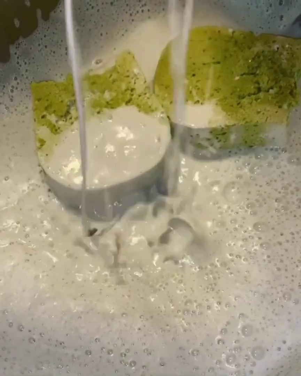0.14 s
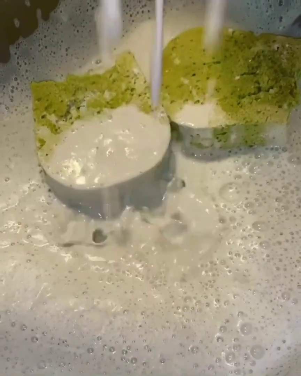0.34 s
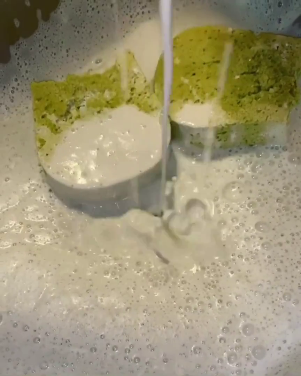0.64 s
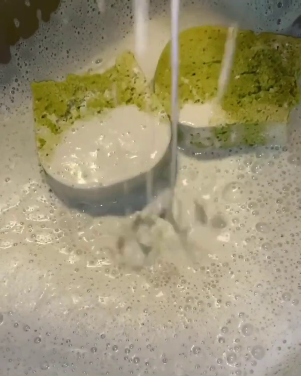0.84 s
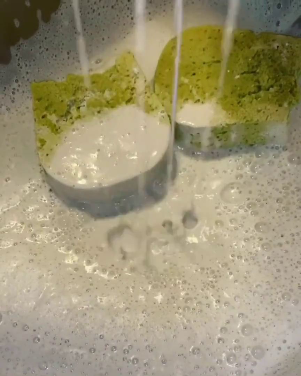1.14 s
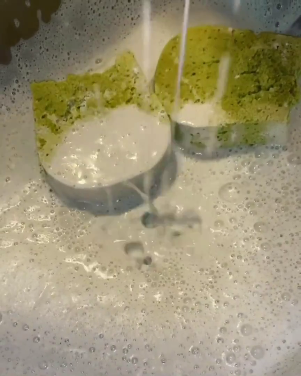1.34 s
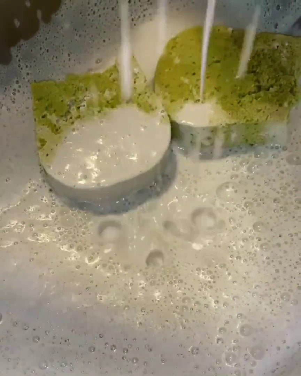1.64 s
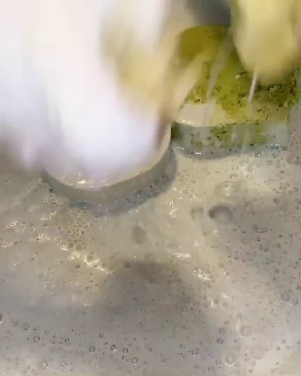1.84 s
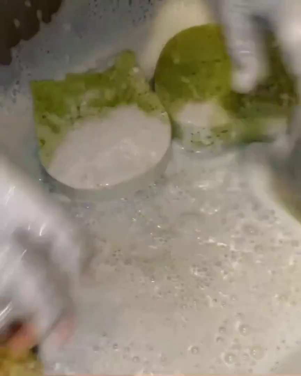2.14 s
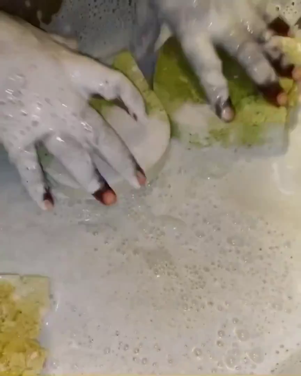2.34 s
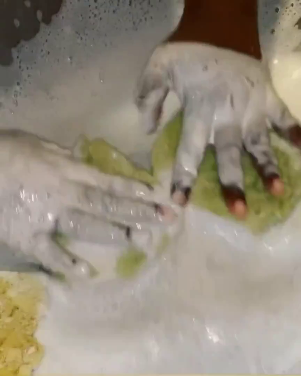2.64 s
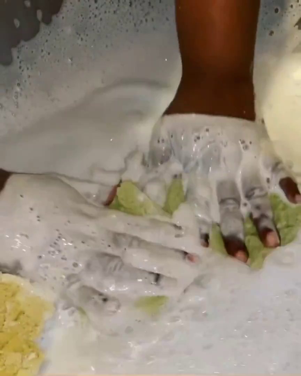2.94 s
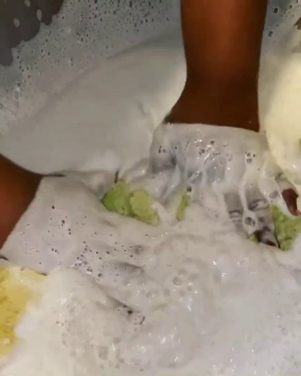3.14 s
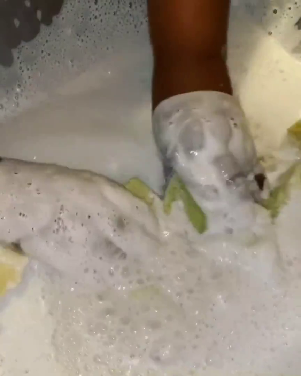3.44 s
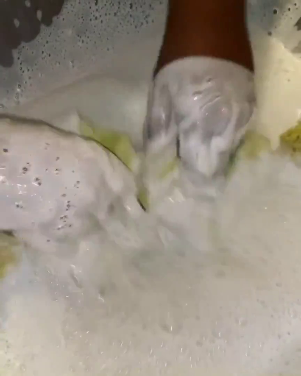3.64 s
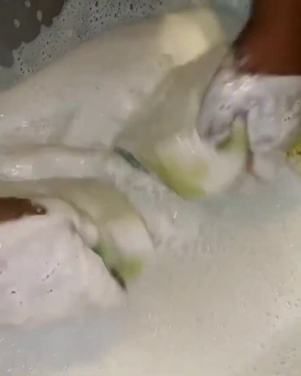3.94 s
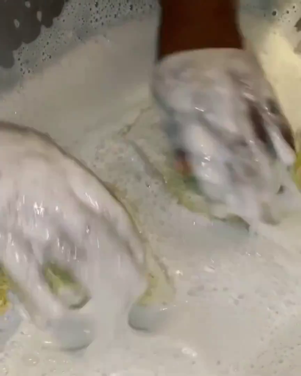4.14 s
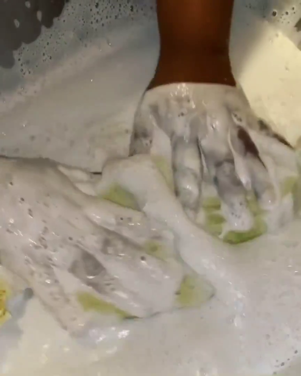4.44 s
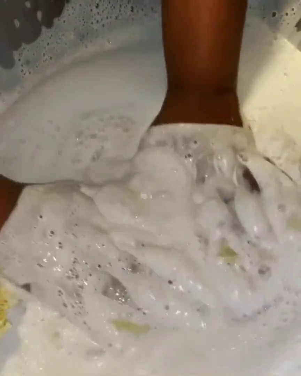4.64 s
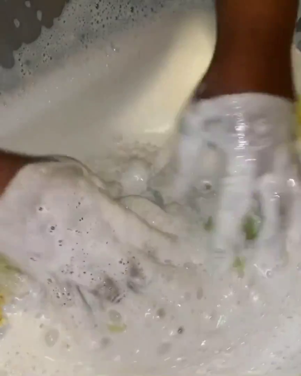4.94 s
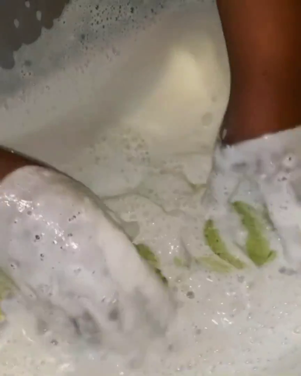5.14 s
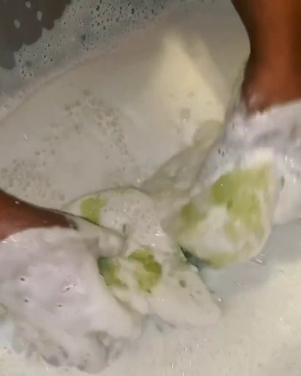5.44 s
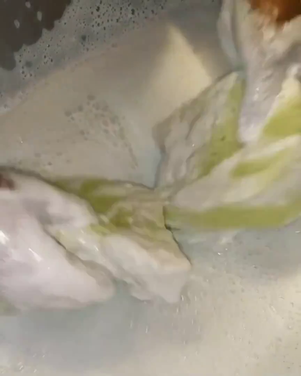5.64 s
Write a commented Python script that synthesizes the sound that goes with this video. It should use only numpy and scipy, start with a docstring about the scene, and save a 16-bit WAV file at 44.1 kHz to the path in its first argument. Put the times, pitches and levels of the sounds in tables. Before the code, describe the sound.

A close, wet stereo scene in a small room with faint low air noise and a wavering hum. From 0 to about 1.9 seconds, threads of soapy water patter into a foamy basin: crisp spatter, hollow low churning, round bubble plops and irregular splats, especially strong around 0.4 and 0.8 to 1.1. The streams gradually thin and stop. At about 1.98 one short hard knock sounds, with a low, quickly damped basin thud. It becomes much quieter, with tiny fizzing and trickles. At 2.75 to 3.15 soaked sponges are pressed, giving dense squelches, bubbling and small smacks. Softer suds follow, then a short squish and gulp near 3.8. Another slow squeeze builds around 4.5 to 4.75, squirting and gurgling. Deep gulps with falling pitch boom at 4.75, 5.0, 5.1 and 5.2. A small splat at 5.4 precedes fading squish, drips and faint foam fizz.

```python
"""Threads of soapy water patter on foam and churn a basin: bursting bubbles and resonant noise.
Large bubbles ring and gobs splat as noise bursts; the streams thin out, and a released sponge gulps.
Two hands then press the sponges: dense bubbles squelch, fizz, squirt, gurgle and trickle. A knock
early in the pressing excites the basin's modes, and later gulps of falling pitch make it boom.
Throughout, resting foam fizzes faintly and a small room adds coloured air noise and a wavering hum."""
import sys
import numpy as np
from scipy import signal
from scipy.fft import rfft, irfft, next_fast_len
from scipy.io import wavfile
from scipy.ndimage import uniform_filter1d, map_coordinates

SR = 44100
rng = np.random.default_rng(int(sys.argv[2]) if len(sys.argv) > 2 else 0)


def dump(signal):
    """Clip the signal to [-1, 1] and save it as 16-bit WAV at the path in sys.argv[1]."""
    limited = np.clip(np.atleast_2d(signal).T, -1, 1)
    pcm = np.round(limited * 32767).astype(np.int16)
    wavfile.write(sys.argv[1], SR, pcm)


N = 255339

# In all tables, levels are relative: each source applies its own trim.
# falling streams, thinning out as the sponges empty: start_s, patter_db, churn_db
FLOW = [(0.0, -43.5, -41.5), (0.23, -44, -47.5), (0.37, -45, -44), (0.5, -52, -44.5), (0.6, -53.5, -45),
        (0.7, -50, -43.5), (0.79, -48.5, -48), (0.9, -47.5, -42.5), (1.036, -49, -43), (1.15, -47.5, -46.5),
        (1.29, -50.5, -43), (1.42, -49.5, -43), (1.566, -52.5, -46.5), (1.66, -51.5, -46), (1.75, -59, -53),
        (1.87, -49, -50)]
# water-filled hollow under the streams, its resonances: centre_hz, width_hz, level_db
HOLLOW = [(70, 9.4, -11.5), (151.5, 19.5, -4.5), (228, 28, -9), (290.3, 28.3, -4.5)]
# narrow peaks and dips between the basin's walls: centre_hz, width_hz, lift_db
WALLS = [(622, 60, -8), (973, 130, -10), (1140, 65, 2), (1554, 220, 5), (1800, 240, 3), (2005, 130, -2.5),
         (2353, 88, 2.5), (2517, 370, -6), (3546, 95, 4.5), (4290, 600, 5.5)]
# spectra of splashing water, mid and side: frequency_hz, density_db (per Hz)
SPLASH_MID = [(220, -22.5), (380, -22.5), (464, -8), (746, -5), (900, -29.5), (1050, -0.5), (1160, -4),
              (1540, -6.5), (1950, -8), (2210, 0.5), (3100, -8), (3560, -5), (4860, -17), (6400, -9),
              (7530, -34), (9790, -38.5), (16600, -120)]
SPLASH_SIDE = [(220, -49), (380, -15.5), (513, -6.5), (814, -15.5), (911, -4.5), (1050, -3.5),
               (1180, -15.5), (1470, -16), (2000, -23), (2300, -11), (3340, -18), (3930, -23.5),
               (4350, -23), (5510, -17), (7530, -32.5), (9790, -43), (16600, -120)]
# spectra of still air, mid and side: frequency_hz, density_db (per Hz)
AIR_MID = [(15, -30.5), (25, -15), (50, -1.5), (75, 1), (190, -6), (248, -3.5), (399, -23.5), (675, -24),
           (761, -22), (943, -47.5), (1090, -46.5), (1290, -28), (2570, -56), (3420, -37.5), (6220, -40.5),
           (7530, -51.5), (9790, -84.5), (16600, -120)]
AIR_SIDE = [(15, -50), (25, -2.5), (98, 1.5), (254, 5.5), (472, -7), (761, -8), (1450, -25.5), (1980, -21),
            (3510, -27), (3950, -32.5), (4450, -35), (5930, -28), (7530, -56.5), (9790, -89), (16600, -120)]
# tones of the room's hum: frequency_hz, level_db
HUM = [(48.4, -63.5), (242.2, -57), (290.7, -62.5)]
# large bubbles driven under by a gob, a plunge or a squeeze: start_s, level_db, pitch_hz, t60_s
BLOOPS = [(0.05, -27.5, 289.7, 0.15), (0.082, -19, 301, 0.037), (0.112, -34, 144, 0.23),
          (0.201, -28, 303.5, 0.079), (0.255, -18, 275, 0.041), (0.36, -33.5, 294.6, 0.11),
          (0.369, -27, 154, .12), (0.414, -25, 150.5, .12), (0.458, -34.5, 280.4, 0.3),
          (0.642, -31, 147.4, 0.14), (0.646, -32.5, 209, 0.11), (0.674, -32.5, 293, 0.13),
          (0.678, -25.5, 156.6, 0.1), (0.693, -30.5, 283.4, 0.25), (0.829, -20.5, 282.6, 0.16),
          (0.838, -23.5, 152, 0.14), (0.848, -15, 297, 0.024), (0.885, -25, 308, 0.069),
          (0.911, -23.5, 277.7, 0.14), (0.934, -32, 231.5, .18), (0.968, -35, 143.6, 0.21),
          (0.976, -23, 273, 0.082), (1.0, -24.5, 295, 0.14), (1.035, -18.5, 291, 0.085),
          (1.046, -37, 141, 0.14), (1.086, -27, 275.3, 0.13), (1.153, -38, 243, 0.24),
          (1.176, -33.5, 299, 0.2), (1.336, -30, 296, 0.12), (1.386, -26, 289, 0.074),
          (1.43, -34.5, 295.7, 0.22), (1.486, -26, 298, 0.066), (1.705, -31, 317, 0.094),
          (1.989, -48, 630, .05), (2.052, -42, 625, 0.044), (2.095, -44, 680, 0.033),
          (2.102, -36, 105, 0.075), (2.76, -35, 303, 0.18), (2.781, -33.5, 434, 0.055),
          (2.794, -29.5, 290, 0.1), (2.799, -34, 198, .18), (2.826, -30.5, 289.4, 0.17),
          (2.87, -35.5, 375, 0.061), (2.888, -26.5, 162.5, 0.15), (2.908, -29.5, 291, .12),
          (2.961, -32.5, 175, 0.11), (3.119, -31.5, 406, 0.071), (3.122, -30.5, 169, 0.089),
          (3.144, -30, 301.4, 0.12), (3.471, -38, 296, 0.056), (3.829, -33.5, 301, 0.058),
          (3.832, -42, 728, 0.057), (4.173, -42, 110, 0.081), (4.262, -37, 295, 0.09),
          (4.555, -33.5, 301, 0.17), (4.714, -30.5, 175, 0.16), (4.749, -24.5, 150, 0.066),
          (5.021, -20.5, 154, 0.088), (5.043, -29.5, 56, 0.27), (5.061, -45, 588, 0.054),
          (5.112, -38, 420, .05), (5.135, -30, 173, 0.096), (5.19, -42.5, 300, 0.069),
          (5.226, -46.5, 708, 0.067), (5.262, -35, 240, 0.062)]
# gobs of suds landing and wet smacks: crest_s, level_db, treble_db (re level),
# bubble_hz, bubble_db (re level)
SPLATS = [(0.058, -27.5, -4.5, 3630, -5.5), (0.081, -38.5, -1, 1910, -2), (0.1504, -42, 1, 2330, -8),
          (0.1951, -27.5, -7, 2296, -3.5), (0.204, -32, 0, 3510, -16), (0.222, -39.5, 4, 5200, -5),
          (0.254, -30, -12, 1702, 1), (0.2894, -33, -6, 1785, -6), (0.3195, -36.5, 4, 3120, -14),
          (0.356, -40, -3, 3580, -7), (0.408, -23, -22, 1498, -10.5), (0.4357, -32.5, -16, 2303, 1.5),
          (0.452, -29, -16, 1495, -5), (0.505, -33, -11.5, 1580, -16), (0.6444, -41, -1, 3580, -19),
          (0.6696, -29, -11, 2180, -12), (0.6874, -37, 1.5, 1080, -13), (0.7444, -40.5, -2, 3530, -9),
          (0.8003, -35, -7, 2215, -14), (0.8278, -17.5, -13.5, 2115, -13),
          (0.8778, -23.5, -11, 3560, -11.5), (0.9216, -27, -28, 1143, -10.5),
          (0.973, -31.5, -7.5, 2225, -5), (0.9874, -30.5, -6, 2190, -9), (1.034, -24.5, -21, 1087, -9.5),
          (1.0654, -33, -9, 1040, -15), (1.084, -26.5, -7.5, 2110, -18), (1.1218, -29.5, -9, 1300, -12),
          (1.149, -37.5, 0, 4270, 1), (1.2062, -35.5, -17, 2170, -5), (1.2342, -30.5, -12, 5400, -17),
          (1.265, -29.5, -5, 1567, -7), (1.3404, -25, -8, 4870, -16.5), (1.384, -27.5, -10, 2230, -16),
          (1.407, -41.5, 3.5, 3500, -5), (1.4295, -28, -6.5, 5760, -10.5), (1.486, -37, -11, 6680, -9),
          (1.5028, -34.5, -15, 1568, -0.5), (1.5184, -39, -16, 1450, -8), (1.5444, -35.5, -3.5, 3500, -7.5),
          (1.579, -27.5, -14, 1514, -6), (1.6354, -37.5, -6, 1180, -15), (1.7007, -33.5, -23, 1298, -10),
          (1.7707, -40.5, -13, 1674, -3.5), (2.023, -41, -17, 1250, -10), (2.094, -35.5, -11.5, 1587, -19),
          (2.773, -34.5, -14, 1575, -3), (2.858, -38, -15, 1790, 2), (2.888, -36, -14, 1454, 6),
          (2.94, -40, 2, 1150, -15), (3.053, -39.5, -8, 3530, -8), (3.117, -27, -14, 1793, -5.5),
          (3.125, -31, -15.5, 1233, -3.5), (3.742, -57.5, 1.5, 1500, -10), (3.829, -34, -24, 1212, -9),
          (3.905, -42.5, -10, 1440, -15), (4.137, -38.5, -7, 1724, -2.5), (4.552, -33, -35, 1540, 2.5),
          (4.7116, -42, -28, 1530, -11), (4.749, -29.5, -27.5, 1788, -8), (5.019, -48.5, -6.5, 2700, -5.5),
          (5.227, -42, -19, 1516, -8), (5.268, -48, -20, 1670, -10), (5.315, -50, -17, 1330, -10),
          (5.4001, -30.5, -9, 1611, -9), (5.457, -43.5, -8.5, 1660, -15)]
# gulps of air as a sponge lets go: time_s, level_db, nominal_pitch_hz, boom_db (re level)
GULPS = [(1.578, -25.5, 285, -43), (2.054, -50, 327, 0), (3.791, -32, 321, -32), (3.905, -44.5, 259, -32),
         (4.744, -30.5, 358, -16), (5.015, -27.5, 279, -20), (5.106, -26.5, 267, -17.5),
         (5.221, -28.5, 193, -22)]
# the basin's modes: frequency_hz, level_db, t60_s
BASIN_MODES = [(53.6, 0, 0.038), (69.4, 2, 0.11), (100.4, -9.5, 0.17), (189, -13, 0.099), (249, -25.5, 0.5),
               (301, -2.5, 0.074), (341.3, -21, 0.18)]
# presses of the hands: crest_s, squelch_db, buildup_s, release_s, fizz_db (re squelch),
# squirt_db (re squelch)
PRESSES = [(1.935, -57.5, 0.12, 0.22, 2, 2.5), (2.01, -58.5, 0.04, 0.23, -5, -12),
           (2.291, -65.5, 0.091, 0.42, 5.5, -13), (2.5, -78.5, 0.1, 0.46, 14.5, -13),
           (2.772, -47.5, 0.26, 0.14, -3, -4), (2.9, -43, 0.27, 0.18, -7, -7.5),
           (3.123, -58, 0.12, 0.18, 2, -9), (3.36, -59, 0.057, 0.082, -8.5, -9),
           (3.68, -69.5, 0.11, 0.19, 3, -17), (3.801, -51, 0.042, 0.065, -13, 3),
           (3.83, -47.5, 0.078, 0.13, -11, -5), (4.139, -60.5, 0.039, 0.084, 5, -9),
           (4.49, -52, 0.34, 0.08, -7, 1), (4.56, -48, 0.22, 0.13, -19, 4),
           (4.625, -58.5, 0.048, 0.089, -3.5, 9.5), (4.745, -53.5, 0.096, 0.12, -9, -8),
           (4.9, -76.5, 0.37, 0.32, 5, -4), (5.391, -64.5, 1, 0.61, -8, -2.5)]
# spectra of soaked foam, mid and side: frequency_hz, density_db (per Hz)
FOAM_MID = [(220, -29.5), (380, -5.5), (603, 2.5), (710, 0.5), (845, -27), (1130, 2.5), (1410, -5.5),
            (1560, -3), (2080, -4.5), (2330, -4.5), (2570, -5), (3930, -22), (4920, -36.5), (6560, -30),
            (7530, -60), (9790, -61), (16600, -120)]
FOAM_SIDE = [(220, -47.5), (380, -21), (488, 6.5), (756, 9.5), (835, 0.5), (995, 9.5), (1290, -4),
             (1620, -7.5), (1930, -15.5), (2740, -5.5), (3600, -18.5), (3980, -28.5), (4290, -21.5),
             (5440, -16), (7530, -34), (9790, -43), (16600, -120)]
# spectrum of bursting films: frequency_hz, density_db (per Hz)
CRACKLE = [(300, -30), (1200, -16.5), (2200, 0), (2900, -9), (4100, -1.5), (4900, -29), (6400, -6.5),
           (7600, -32), (11000, -41.5), (16600, -120)]
# spectra of squirts, mid and side: frequency_hz, density_db (per Hz)
SQUIRT_MID = [(300, -42), (600, -13), (760, -6.5), (900, -12.5), (1100, -5), (1800, 1), (2050, -13),
              (3000, -31), (6000, -58)]
SQUIRT_SIDE = [(300, -20), (480, -5.5), (758, 5), (850, -9.5), (1000, -6.5), (1610, -1), (1920, -20),
               (2790, -13.5), (6000, -38)]
# spectrum of rolling air pockets: frequency_hz, density_db (per Hz)
GURGLE = [(24, -47.5), (40, -10.5), (70, -6), (123, -9), (161, -2), (216, -4.5), (260, -7), (298, 2.5),
          (382, -15.5), (480, -16), (620, -45.5), (1060, -120)]
# contacts of the knock: crest_s, level_db, ring_hz
KNOCK = [(1.978, -37, 2210), (1.979, -23, 1297), (1.981, -35, 3994)]

TIME = np.arange(N) / SR
AGE = np.arange(SR // 2) / SR  # s, time since an event began
TOP_HZ = 11600  # band limit of the output
LEAD = .012  # s, from the start of a burst or ring to the knee of its envelope
STREAMS_END_S, STREAMS_FADE_S = 1.92, .16  # when the last thread breaks, length of the dwindling
PATTER_DB, CHURN_DB = -4, 1  # trims of the streams' layers
PATTER_FLUTTER_DB = 1.2  # unevenness of the patter
PLIP_DB, SPATTER_DB = -4, 1.6  # ringing droplets re the drops; how strongly the drops clump
CAVITY_DB = 3  # rms depth of the resonances that open and close in the foam
BLOOP_RISE_S, BLOOP_GLIDE = 0.0055, 0.024  # swell of a large bubble; upward glide of its phase, a share
TEAR_T60_S, SPRAY_T60_S = .029, .027  # decay of torn foam and of its fine spray
SMALL_T60_S, SMALL_GLIDE = 0.01, 0.018  # decay of a small bubble; upward glide of its phase, a share
PRESS_FALL_DB, PRESS_CURVE = 26.5, 1.22  # fall over a build-up or release; 1 sharp crest, 2 round
HELD_DB = -81  # squelch level, before trim, of sponges that are only held
CRACKLE_DB = -8.5  # bursting films re the untrimmed fizz level
SQUIRT_BEND = .16  # share by which a squirting bubble's glide may vary either way
SUDS_FLUTTER_DB = .7  # unevenness of all the pressed suds
GURGLE_DB, GURGLE_GROWS = -15, 0.57  # gurgle dB = GURGLE_DB + GURGLE_GROWS * squelch dB
EMPTY_S, DRAIN_S = 5.7, 0.16  # when the sponges run out of water, and how gradually
TRICKLE_DB, TRICKLE_SWING_DB = -70.5, 3  # suds running off the hands, how much they come and go
KNOCK_BOOM_S, KNOCK_BOOM_DB = 1.9845, -17.5  # when and how strongly the basin answers the knock
KNOCK_DULLING = 0.75  # share of the crack's treble that the suds soak up


def amp(db):
    """Logarithmic level law: decibels to amplitude gain."""
    return 10 ** (np.asarray(db) / 20)


def unit(x):
    """Power normalisation: each channel at rms 1."""
    return x / np.sqrt(np.mean(x ** 2, axis=-1, keepdims=True) + 1e-20)


def curves(rows):
    """Linear interpolation in time: one value per sample for each column after the first."""
    times, *columns = np.transpose(rows)
    return [np.interp(TIME, times, column) for column in columns]


def wobble(rate):
    """Band-limited fluctuation: a smooth random curve with rate knots a second."""
    knots = rng.standard_normal(int(N * rate / SR) + 4)
    return map_coordinates(knots, [TIME * rate])


def fade(t, t60):
    """Exponential damping: decay by 60 dB in t60."""
    return np.exp(-np.log(1000) * t / np.maximum(t60, 1e-3))


def add(track, s, sound):
    """Superposition: mix a sound into a track from time s."""
    part = track[..., max(round(s * SR), 0):][..., :sound.shape[-1]]
    part += sound[..., :part.shape[-1]]


def filtered(x, response):
    """Linear filtering: multiply the spectrum of x by a response of frequency."""
    size = next_fast_len(x.shape[-1] + SR // 4)
    spectrum = rfft(x, size) * response(np.fft.rfftfreq(size, 1 / SR))
    return irfft(spectrum, size)[..., :x.shape[-1]]


def coloured(x, spectra, peaks=()):
    """Minimum-phase filtering at unit power: one spectrum a channel, resonant peaks on top."""
    size = 4096
    hz = np.fft.rfftfreq(size, 1 / SR)
    levels = []
    for spectrum in spectra:
        knot_hz, knot_db = np.transpose(spectrum)
        levels.append(np.interp(np.log(hz + 1), np.log(knot_hz), knot_db))
    db = np.array(levels)
    for centre, width, lift in peaks:
        db = db + lift / (1 + (2 * (hz - centre) / width) ** 2)
    # keeping only the causal half of the cepstrum makes the filter causal
    cepstrum = irfft(np.log(amp(db) + 1e-6))
    kernel = irfft(np.exp(rfft(2 * cepstrum[:, :size // 2], size)))
    return signal.fftconvolve(x, unit(kernel) / np.sqrt(size), axes=1)[:, :N]


def treble(x, edge_hz):
    """High-pass filtering: the part of x above a soft edge."""
    return filtered(x, lambda hz: 1 - 1 / (1 + (hz / edge_hz) ** 6))


def wide(x, side_db):
    """Mid-side stereo: change the side channel's level by side_db."""
    return x * amp([[0], [side_db]])


def reflected(x, wet_db, t60):
    """Diffuse reverberation: add the short, dense answer of the basin and the room."""
    tail = rng.standard_normal((2, len(AGE))) * fade(AGE, t60) * (AGE > .002)
    tail = unit(tail) / np.sqrt(len(AGE))
    return x + amp(wet_db) * signal.fftconvolve(x, tail, axes=1)[:, :N]


def bubbles(rate, low_hz, high_hz, cycles, spread_db, size, bend=0):
    """Bubble resonance: random damped sines, mid and side, of uneven strength, mostly gliding up."""
    draw = rng.random((int(rate * N / SR), 6))
    start, pitch, strength, life, bearing, depth = draw.T[:, :, None]
    hz = low_hz + (high_hz - low_hz) * pitch
    t = np.arange(size) / SR
    t60 = cycles * (.5 + life) / hz  # ring lasts about this many cycles
    loud = amp(-spread_db * np.log(np.maximum(strength, .01))) / np.sqrt(t60)
    glide = 0.079 + bend * (2 * depth - 1)
    phase = 2 * np.pi * hz * t * (1 + glide * np.minimum(t / t60, 1))
    pops = loud * fade(t, t60) * np.sin(phase)
    at = ((start * N).astype(int) + np.arange(size)).ravel()
    angle = 2 * np.pi * bearing
    pair = [np.bincount(at, (pops * gain).ravel(), minlength=N)[:N]
            for gain in (np.cos(angle), np.sin(angle))]
    return unit(np.array(pair))


def cavities(x):
    """Time-varying resonance: hollows in the foam, a few hundred Hz wide, last some 30 ms."""
    z = signal.stft(x, nperseg=512)[2]
    field = rng.standard_normal(z.shape[1:])
    field = uniform_filter1d(field, size=4, axis=0)  # across frequency
    field = uniform_filter1d(field, size=6, axis=1)  # across time
    return signal.istft(z * amp(CAVITY_DB * field / field.std()), nperseg=512)[1][:, :N]


def swell(rise, t60):
    """Onset and damping: an envelope that builds up around LEAD and then dies away."""
    onset = 1 / (1 + np.exp(np.minimum((LEAD - AGE) / rise, 20)))
    return onset * fade(np.maximum(AGE - LEAD, 0), t60)


def burst(rise, t60):
    """Amplitude-modulated noise: a crackling mid and side pair under a swell."""
    steps = np.repeat(rng.standard_normal(len(AGE)), repeats=32)[:len(AGE)]
    grit = amp(4 * steps)
    return unit(rng.standard_normal((2, len(AGE))) * grit) * swell(rise, t60)


def blip(hz, t60, glide):
    """Damped resonance: a short ring, rising if glide > 0, with random mid and side phases."""
    cycles = hz * AGE * (1 + glide * np.minimum((AGE - LEAD) / t60, 1))
    return np.sin(2 * np.pi * (cycles + rng.random((2, 1)))) * swell(0.0022, t60)


def streams():
    """Impact and cavity resonance: threads patter in clumps, shed ringing drops, churn the hollow."""
    patter_db, churn_db = curves(FLOW)
    flowing = np.clip((STREAMS_END_S - TIME) / STREAMS_FADE_S, 0, 1)
    drops = bubbles(rate=6000, low_hz=340, high_hz=11040, cycles=22, spread_db=2.2, size=260)
    drops = unit(drops * amp(SPATTER_DB * wobble(170)))
    plips = bubbles(rate=260, low_hz=430, high_hz=5500, cycles=65, spread_db=2.6, size=2000, bend=.08)
    wet = reflected(drops + amp(PLIP_DB) * plips, wet_db=-3.5, t60=.12)
    patter = cavities(coloured(wet, [SPLASH_MID, SPLASH_SIDE], WALLS))
    patter_level = amp(patter_db + PATTER_DB + PATTER_FLUTTER_DB * wobble(41.77))
    patter = wide(unit(patter), side_db=3.0) * patter_level

    def hollow(f):
        """Parallel resonators, with a low-pass edge at 370 Hz."""
        modes = sum(amp(db) * 1j * f * w / (c * c - f * f + 1j * f * w) for c, w, db in HOLLOW)
        return modes / (1 + (f / 370) ** 10)

    churn = unit(filtered(rng.standard_normal((2, N)), hollow))
    churn = wide(churn, side_db=-12.5) * amp(churn_db + CHURN_DB)
    return flowing * (patter + churn)


def settling():
    """Film rupture: tiny bubbles burst all over the resting foam, a faint even fizz."""
    ticks = bubbles(rate=900, low_hz=900, high_hz=8000, cycles=22, spread_db=2.5, size=900)
    wet = reflected(ticks, wet_db=6.5, t60=0.05)
    return amp(-77.0) * unit(coloured(wet, [SPLASH_MID, SPLASH_SIDE], WALLS))


def room():
    """Broadband noise and steady tones: still air, and a hum wavering in level and phase."""
    air = coloured(rng.standard_normal((2, N)), [AIR_MID, AIR_SIDE])
    air = wide(unit(air), side_db=-3.0)
    hum = np.zeros(N)
    for hz, db in HUM:
        level = amp(db - 1.5 + 0.69 * wobble(3.2)) * np.sqrt(2)  # rms to peak
        hum += level * np.sin(2 * np.pi * hz * TIME + .5 * wobble(5.2))
    return amp(-56.0) * air + wide(hum, side_db=-31.5)


def bloops():
    """Bubble resonance: a large bubble swells, rings and rises in pitch as it nears the surface."""
    out = np.zeros(N)
    for s, db, hz, t60 in BLOOPS:
        phase = 2 * np.pi * hz * AGE * (1 + BLOOP_GLIDE * np.minimum(AGE / t60, 1))
        envelope = (1 - np.exp(-AGE / BLOOP_RISE_S)) * fade(AGE, t60)
        add(out, s, amp(db) * envelope * np.sin(phase))
    return reflected(wide(out, side_db=-16), wet_db=-11, t60=0.036)


def splats():
    """Impact noise and entrained air: a gob tears the foam and traps a small ringing bubble."""
    body, spray, trapped = np.zeros((3, 2, N))
    for s, db, treble_db, hz, bubble_db in SPLATS:
        start = s - LEAD
        add(body, start, amp(db - 6) * burst(rise=.001, t60=TEAR_T60_S))
        add(spray, start, amp(db + treble_db - 3.5) * burst(rise=.0008, t60=SPRAY_T60_S))
        ring = blip(hz, t60=SMALL_T60_S, glide=SMALL_GLIDE)
        add(trapped, start + 0.001, amp(db + bubble_db) * ring)
    # the spray replaces the body in the treble
    bursts = body + treble(spray - body, edge_hz=1800)
    bursts = coloured(bursts, [SPLASH_MID, SPLASH_SIDE], WALLS)
    return reflected(wide(bursts, side_db=3) + wide(trapped, side_db=-0.5), wet_db=-3, t60=0.18)


def basin_ring():
    """Modal superposition: damped modes answer one blow, the low ones taking longer to build."""
    ring = np.zeros(len(AGE))
    for hz, db, t60 in BASIN_MODES:
        envelope = fade(AGE, t60) * (1 - np.exp(-AGE * hz / 1.26))
        ring += amp(db) * envelope * np.sin(2 * np.pi * hz * AGE)
    return ring


def gulps():
    """Suction release: a sponge lets go with a few cycles of falling pitch, and the basin booms."""
    pulses, boom = np.zeros((2, N))
    push = (AGE / .006 * np.exp(1 - AGE / .006)) ** 3  # crests after 6 ms
    for s, db, hz, boom_db in GULPS:
        # pitch falls from 1.13 to 0.6 times nominal
        phase = 2 * np.pi * hz * (.6 * AGE + .008 * (1 - np.exp(-AGE / .015)))
        add(pulses, s + .002, amp(db + 1) * push * np.sin(phase))
        add(boom, s + 0.01307, amp(db + boom_db + 17.0) * basin_ring())
    muffled = filtered(pulses, lambda hz: 1 / (1 + (hz / 480) ** 10))
    soft_boom = filtered(boom, lambda hz: 1 / (1 + (hz / 230) ** 4))
    return reflected(wide(muffled + soft_boom, side_db=-13.5), wet_db=-6, t60=0.19)


def handling():
    """Gain envelope: the hands take hold of the sponges as the streams stop, 0 to 1."""
    return np.clip((TIME - STREAMS_END_S) / 0.084 + 1, 0, 1)


def pressure():
    """Power summation: presses build up and let go, giving squelch, fizz and squirt levels in dB."""
    power = np.full((3, N), amp(HELD_DB) ** 2)
    for s, db, build, release, fizz_db, squirt_db in PRESSES:
        away = np.maximum((s - TIME) / build, (TIME - s) / release)
        press = amp(db - PRESS_FALL_DB * away ** PRESS_CURVE)
        power += press ** 2 * amp([[0], [fizz_db], [squirt_db]]) ** 2
    return 10 * np.log10(power)


def sponges():
    """Flow through pores: pressed suds squelch, fizz, crackle, and squirt with bending pitch."""
    squelch_db, fizz_db, squirt_db = pressure()
    pores = bubbles(rate=5000, low_hz=337, high_hz=10280, cycles=49, spread_db=1.5, size=280)
    lather = bubbles(rate=700, low_hz=900, high_hz=5000, cycles=45, spread_db=2.0, size=1300)
    suds = reflected(pores + .7 * lather, wet_db=-3, t60=0.058)
    foam = cavities(coloured(suds, [FOAM_MID, FOAM_SIDE], WALLS))
    fine = treble(foam, edge_hz=4690)
    squelch = wide(unit(foam - fine), side_db=6.0) * amp(squelch_db - 3.5)
    fizz = unit(fine) * amp(fizz_db - 5)
    films = bubbles(rate=2400, low_hz=1200, high_hz=7000, cycles=14, spread_db=2.6, size=220)
    crackle = wide(unit(coloured(films, [CRACKLE, CRACKLE])), side_db=1.5)
    crackle = crackle * amp(fizz_db + CRACKLE_DB)
    jets = bubbles(rate=900, low_hz=420, high_hz=2100, cycles=70, spread_db=1.3, size=3400,
                   bend=SQUIRT_BEND)
    squirt = wide(unit(coloured(jets, [SQUIRT_MID, SQUIRT_SIDE])), side_db=5.0)
    squirt = squirt * amp(squirt_db - 5.0)
    flutter = amp(SUDS_FLUTTER_DB * wobble(30))
    return handling() * (squelch + fizz + crackle + squirt) * flutter


def gurgle():
    """Low bubble resonance: large air pockets roll from under pressed sponges until these are empty."""
    gurgle_db = GURGLE_DB + GURGLE_GROWS * pressure()[0]
    pockets = bubbles(rate=600, low_hz=48.4, high_hz=469.0, cycles=14, spread_db=1, size=2400)
    soaked = 1 / (1 + np.exp((TIME - EMPTY_S) / DRAIN_S))
    rolling = wide(unit(coloured(pockets, [GURGLE, GURGLE])), side_db=-13.0)
    return handling() * soaked * rolling * amp(gurgle_db)


def trickles():
    """Intermittent dripping: suds run off the hands in fits and starts, with small wet ticks."""
    drips = bubbles(rate=240, low_hz=450, high_hz=4200, cycles=30, spread_db=2.4, size=1500)
    wet = reflected(drips, wet_db=5.5, t60=0.091)
    running = unit(coloured(wet, [FOAM_MID, FOAM_SIDE], WALLS))
    return handling() * running * amp(TRICKLE_DB + TRICKLE_SWING_DB * wobble(7.6))


def knock():
    """Impact excitation: a quick cluster of ringing contacts, then the basin's modes."""
    crack, ring, boom = np.zeros((3, 2, N))
    for s, db, hz in KNOCK:
        add(crack, s - LEAD, amp(db - 4.5) * burst(rise=.0022, t60=.05))
        add(ring, s - LEAD, amp(db - 1.5) * blip(hz, t60=.011, glide=0))
    add(boom, KNOCK_BOOM_S, amp(KNOCK_BOOM_DB) * basin_ring())
    crack = wide(coloured(crack, [SPLASH_MID, SPLASH_SIDE], WALLS), side_db=-0.5)
    crack = crack - KNOCK_DULLING * treble(crack, edge_hz=2100)
    return reflected(crack, wet_db=-8.5, t60=0.21) + ring + wide(boom, side_db=-11.0)


def scene():
    """Superposition of all sources as mid and side, decoded into left and right."""
    pouring = streams() + bloops() + splats()
    pressing = gulps() + sponges() + gurgle() + trickles()
    surroundings = settling() + room()
    mid, side = pouring + pressing + knock() + surroundings
    return np.array([mid - side, mid + side])


def record(dry):
    """Band limitation: nothing at or above TOP_HZ is kept."""
    return filtered(dry, lambda hz: hz < TOP_HZ)


dry = scene()
out = record(dry)
dump(out)
```